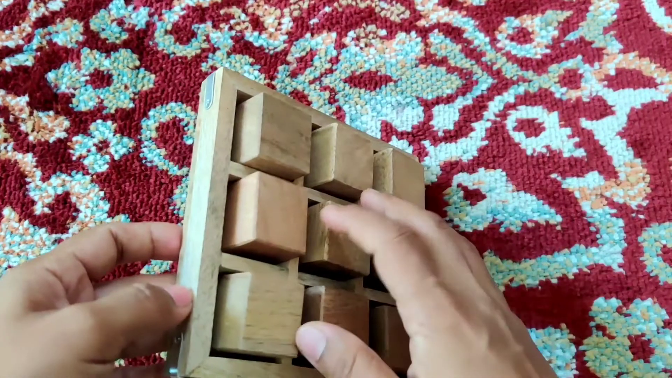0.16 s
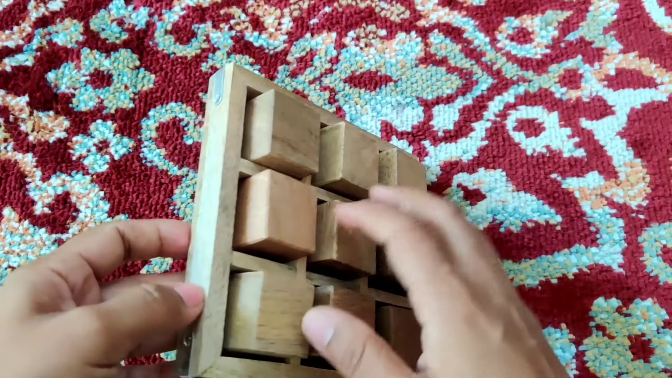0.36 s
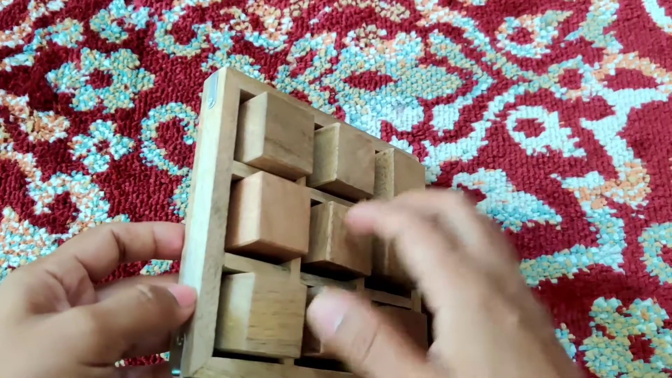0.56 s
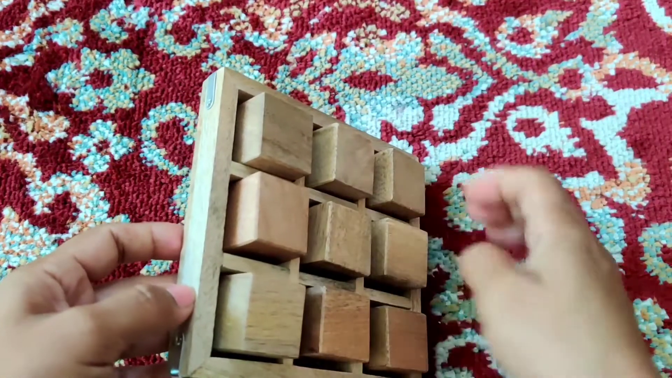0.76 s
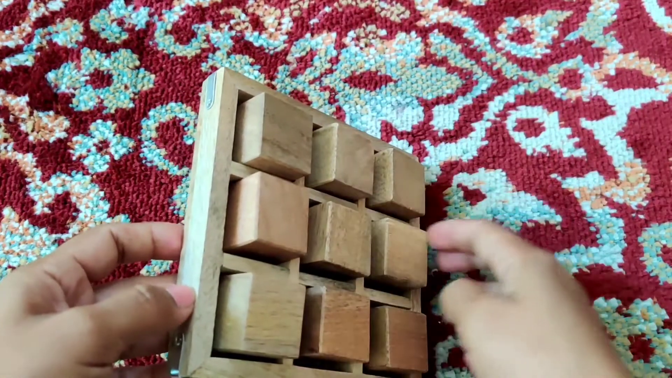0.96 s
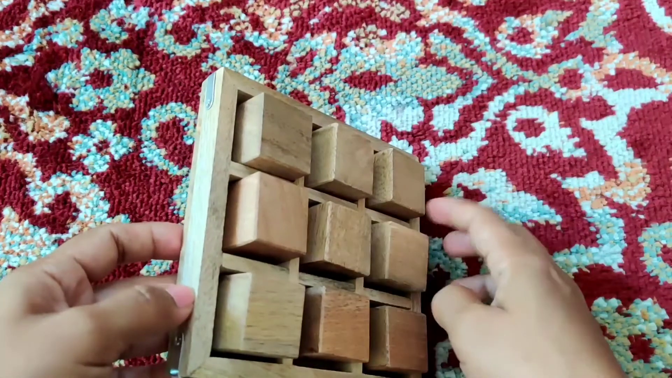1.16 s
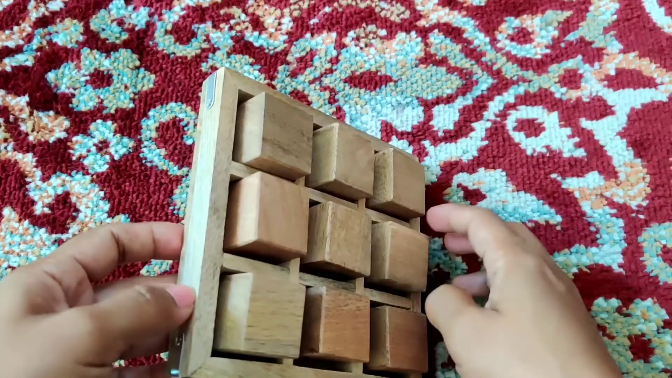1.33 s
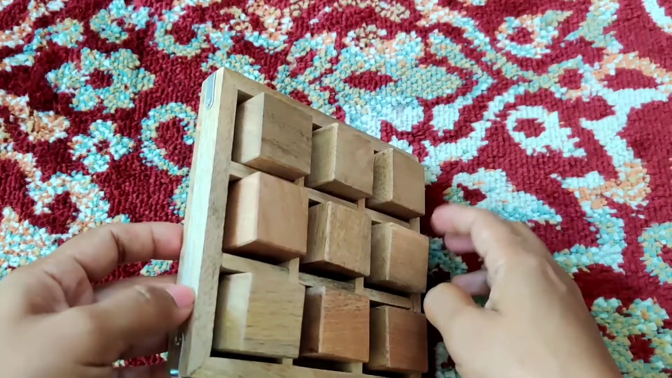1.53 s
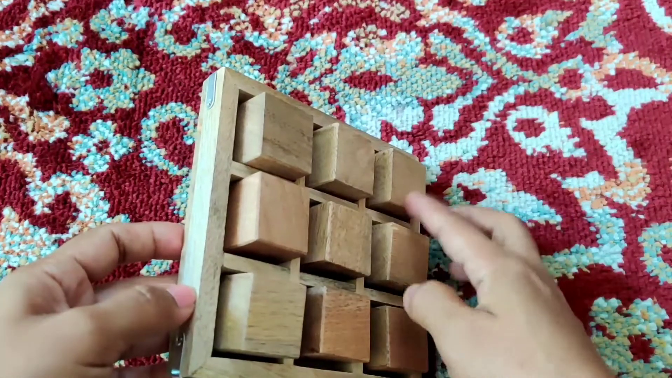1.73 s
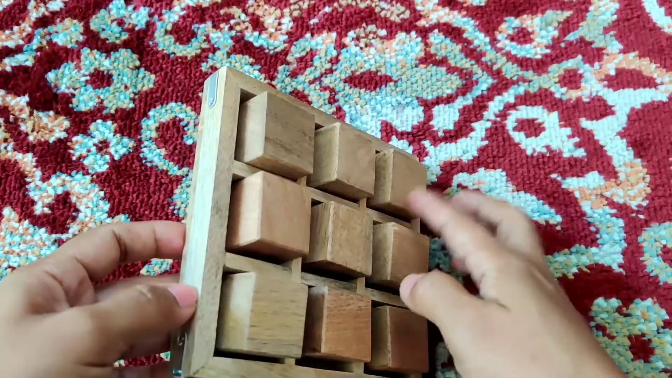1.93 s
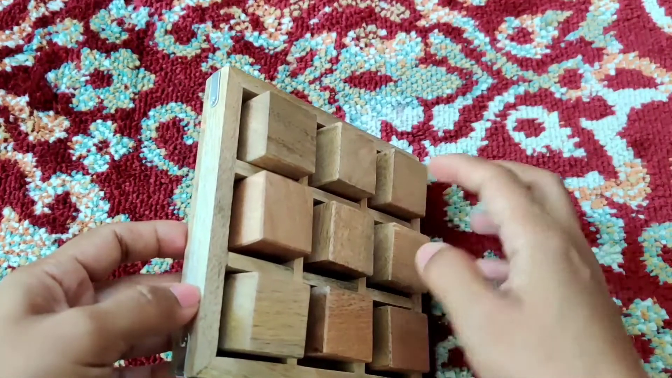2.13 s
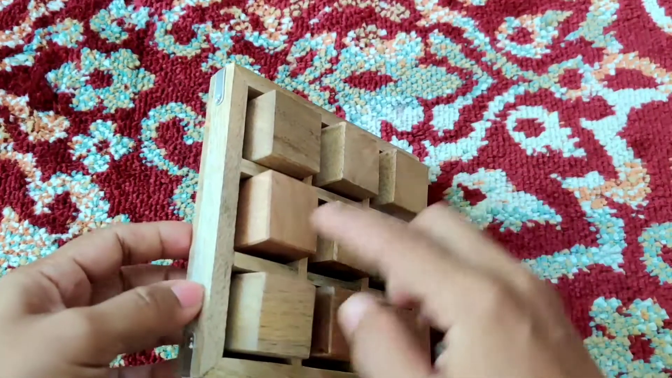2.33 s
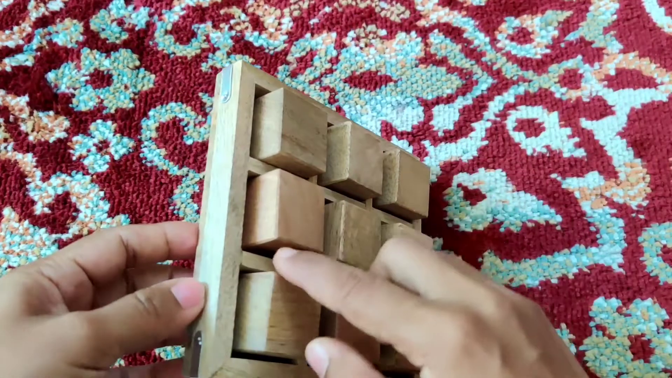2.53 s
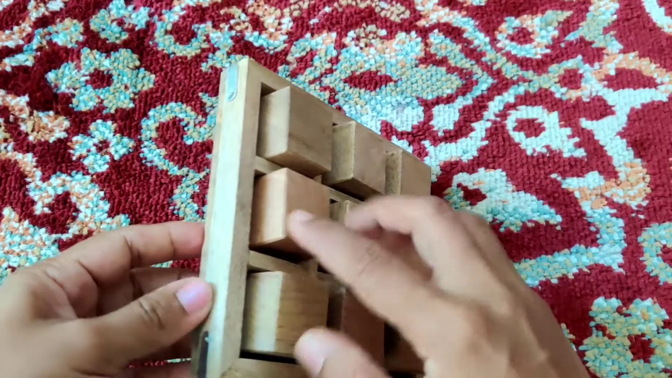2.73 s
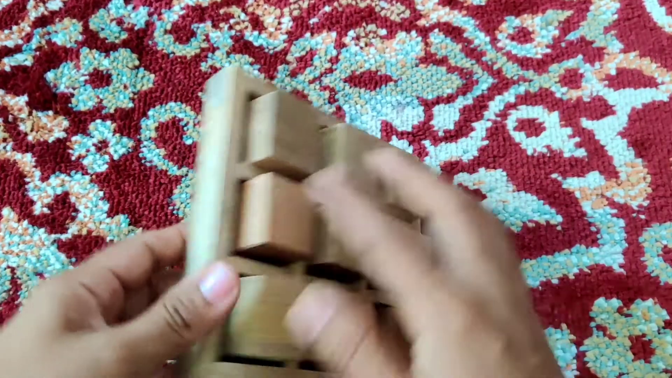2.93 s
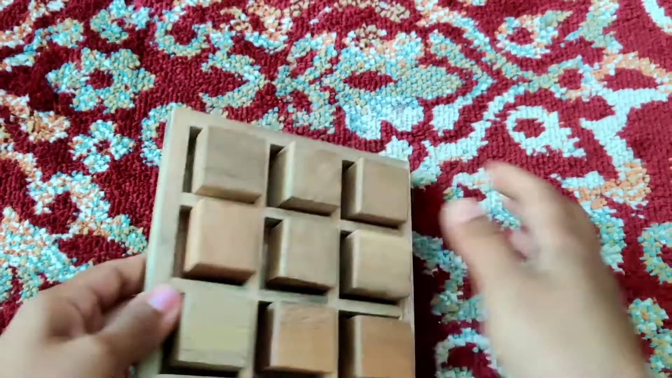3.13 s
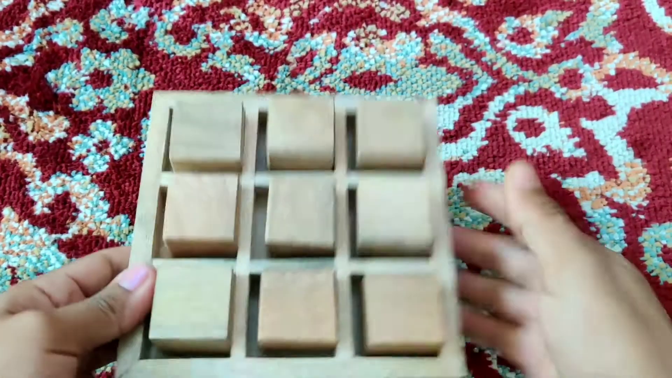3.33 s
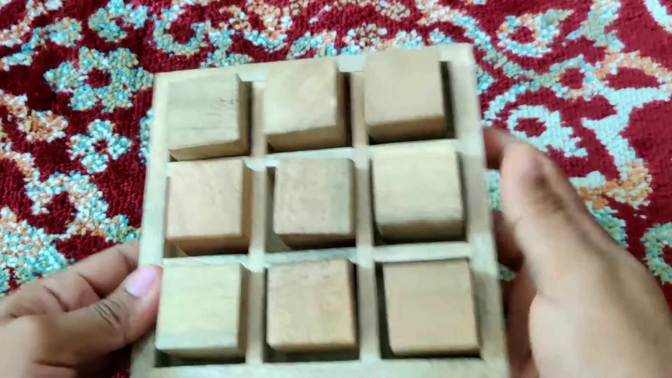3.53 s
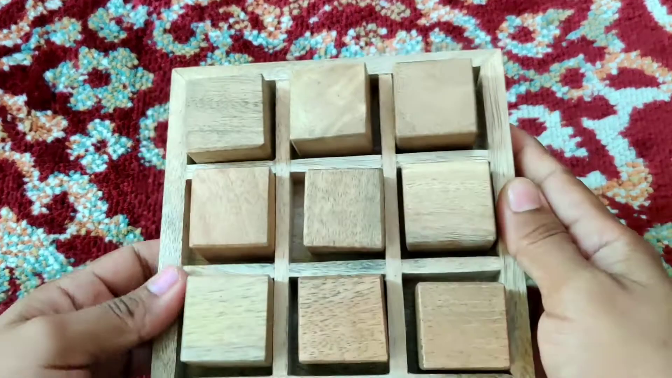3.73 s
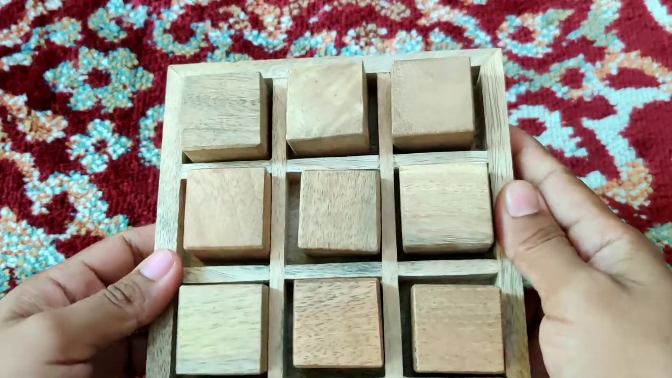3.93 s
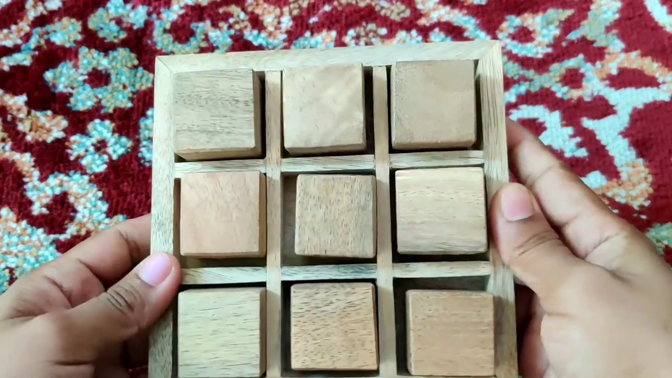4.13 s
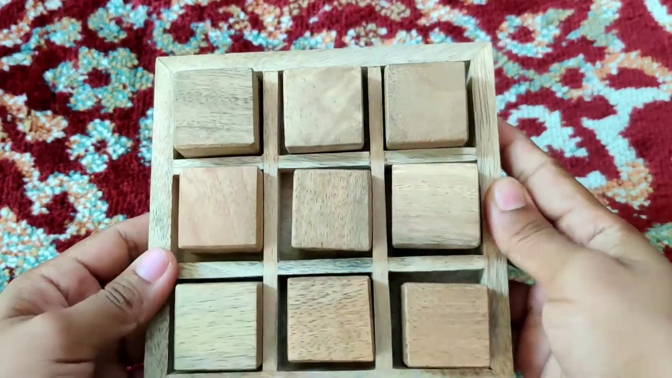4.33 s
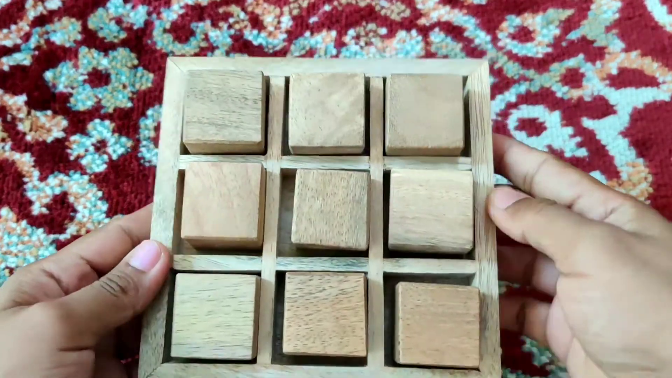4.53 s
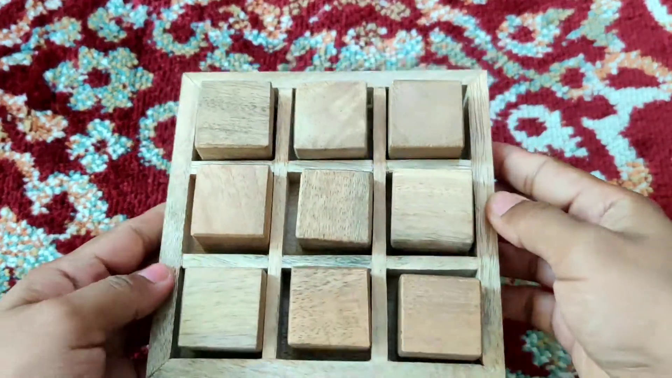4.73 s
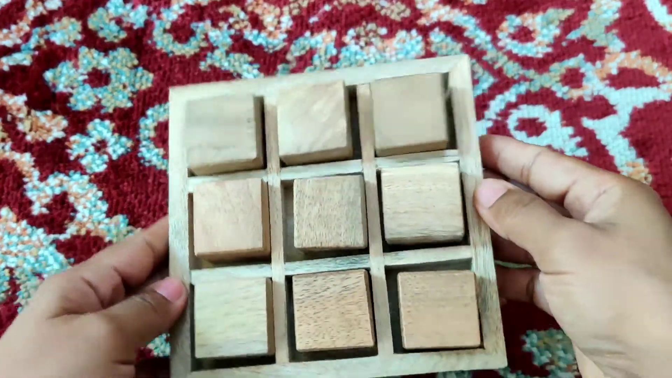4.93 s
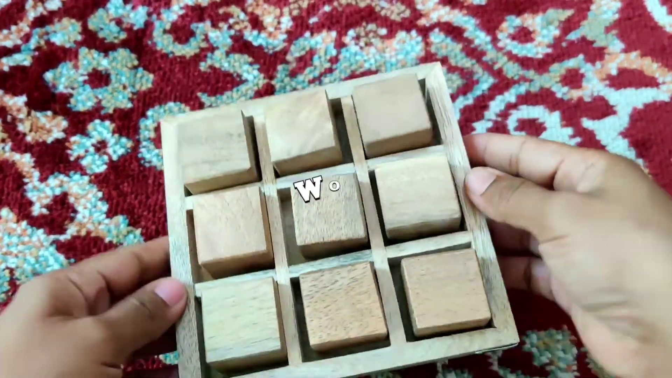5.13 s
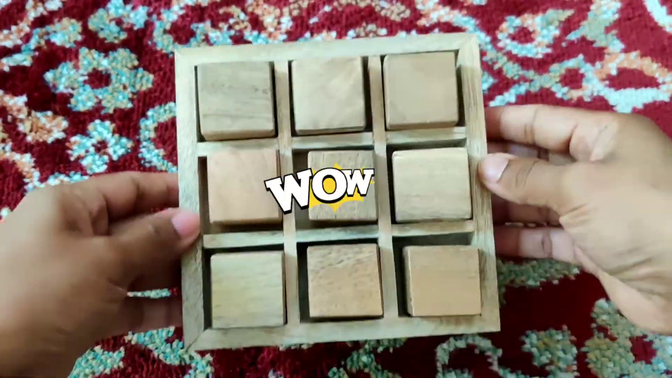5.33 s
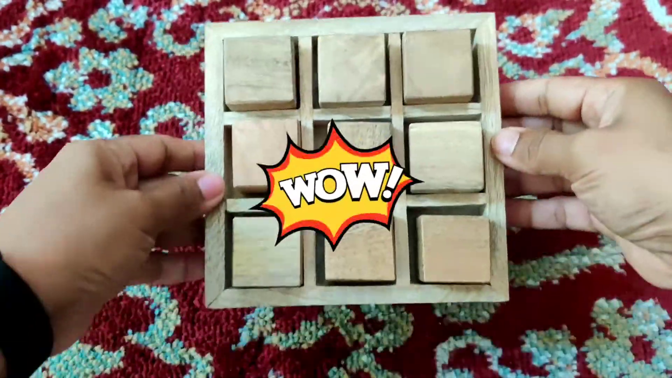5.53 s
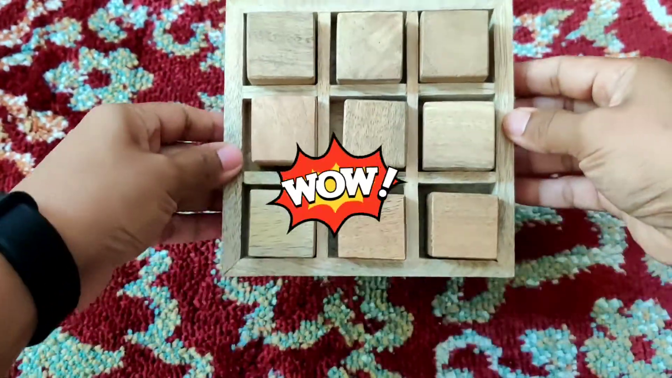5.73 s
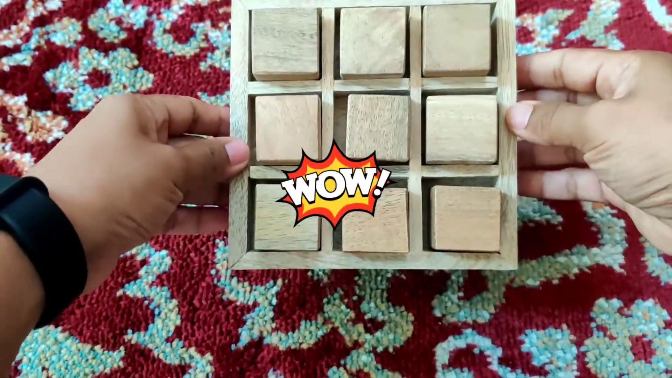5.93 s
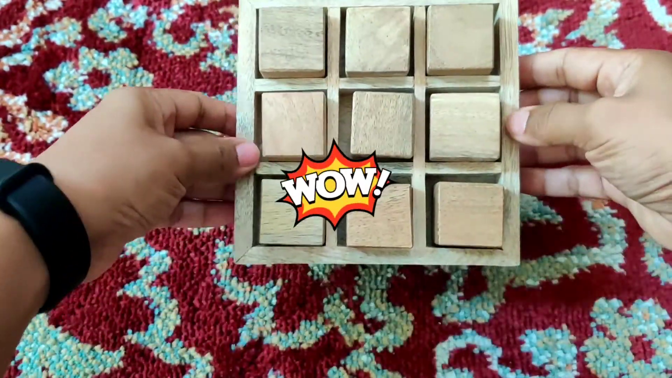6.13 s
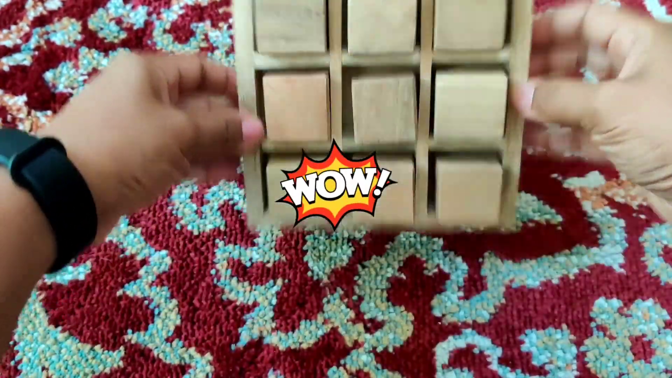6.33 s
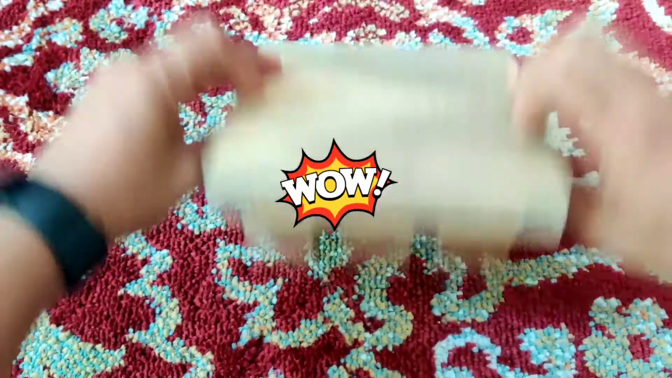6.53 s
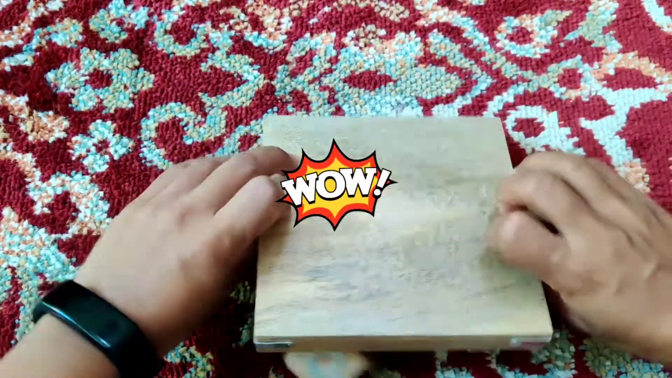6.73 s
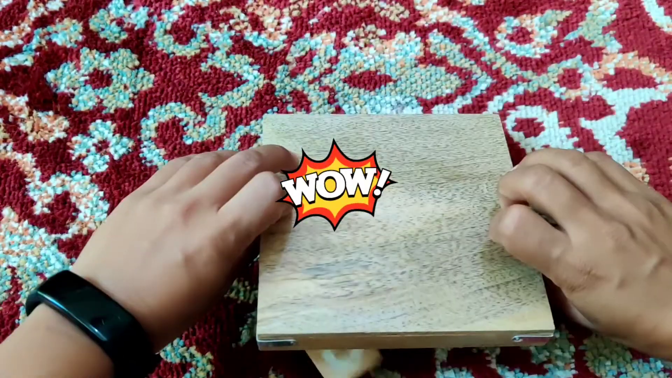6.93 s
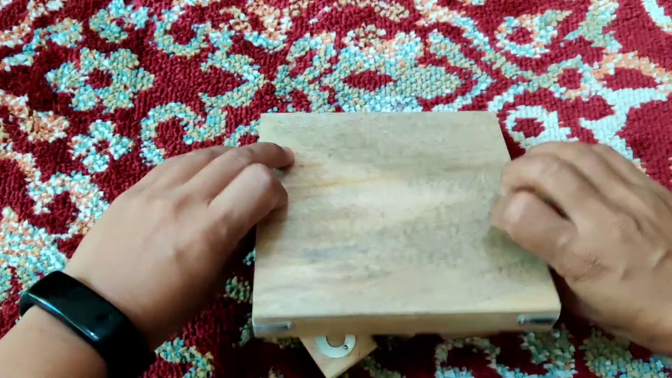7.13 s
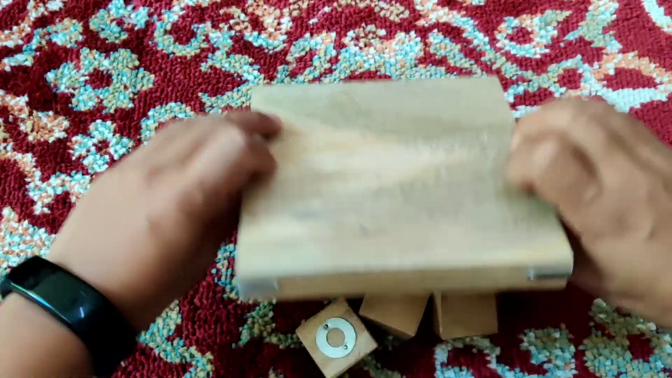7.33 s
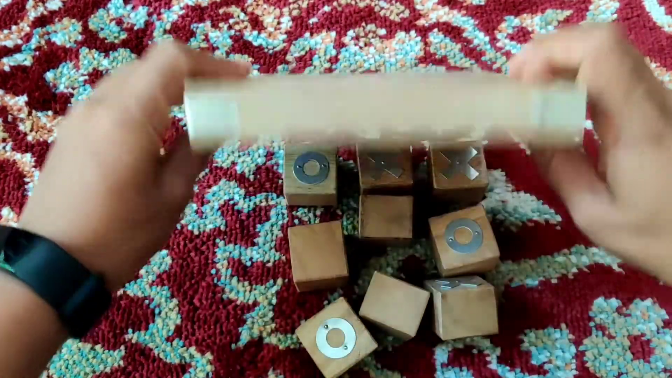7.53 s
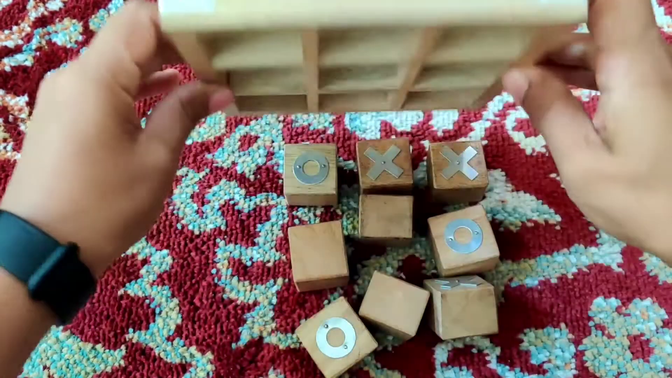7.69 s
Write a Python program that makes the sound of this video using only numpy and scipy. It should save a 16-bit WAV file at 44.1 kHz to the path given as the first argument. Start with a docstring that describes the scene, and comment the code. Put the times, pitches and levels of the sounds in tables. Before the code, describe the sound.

Loose wooden cubes clack and rattle softly in a handheld wooden tray, then the tray is flipped onto carpet with one loud clattering knock.

```python
"""Over a quiet room's murmur, loose cubes in a wooden tray tap their pockets and fingers brush the wood.
Two cubes clack, faces chirp; then the tray tilts and the cubes slide, knock and rattle.
Near the end the tray, overturned, lands on carpet: a clattering knock, jostling, rocking, late topples.
Knocks are struck modes plus a noise tick; friction is gated, coloured noise; chirps are swept sines.
Two unlike microphone ports pick up the tray; early echoes and a diffuse room tail follow."""
import sys
import numpy as np
from scipy import signal
from scipy.fft import rfft, irfft, next_fast_len
from scipy.io import wavfile

SR = 44100
rng = np.random.default_rng(int(sys.argv[2]) if len(sys.argv) > 2 else 0)


def generate_wav(sig):
    """Save sig (samples, or channels by samples) to the path in sys.argv[1] as 16-bit PCM at SR."""
    pcm = np.round(np.clip(np.atleast_2d(sig).T, -1, 1) * 32767).astype(np.int16)
    wavfile.write(sys.argv[1], SR, pcm)


N = 346581
HIT_S = np.arange(int(.6 * SR)) / SR  # time axis of the longest knock
ATTACK = int(.004 * SR)  # samples over which a knock's level is set


def undb(db):
    """Decibels to gain."""
    return 10 ** (np.asarray(db) / 20)


def along(points, hz):
    """Read (Hz, value) points on a log-frequency axis."""
    point_hz, value = np.transpose(points)
    return np.interp(np.log(np.maximum(hz, 1)), np.log(point_hz), value)


def colour(x, points):
    """Causal, minimum-phase filter with the given (Hz, dB) response."""
    size = next_fast_len(x.shape[-1] + 2048, True) * 2
    gain = undb(along(points, np.fft.rfftfreq(size, 1 / SR)))
    # fold the cepstrum onto positive time
    cepstrum = irfft(np.log(gain))
    cepstrum[1:size // 2] *= 2
    cepstrum[size // 2 + 1:] = 0
    response = np.exp(rfft(cepstrum))
    return irfft(rfft(x, size) * response)[..., :x.shape[-1]]


def level(x, db, count=None):
    """Scale to an rms level, taken over the first count samples."""
    return x * undb(db) / np.sqrt(np.mean(x[..., :count] ** 2) + 1e-30)


def add(out, s, x):
    """Mix a sound in at time s."""
    start = max(int(round(s * SR)), 0)
    out[:, start:start + x.shape[-1]] += x[..., :N - start]


def diffuse(count, apart_hz=3500, least=0.51):
    """Noise from all around: most alike at both ports in the bass, unrelated in the treble."""
    mid, side = rfft(rng.standard_normal((2, count)))
    hz = np.fft.rfftfreq(count, 1 / SR)
    share = np.clip(least + (hz / apart_hz) ** 2, 0, 1)
    sign = np.array([[1], [-1]])
    return irfft((mid + sign * share * side) / np.sqrt(1 + share ** 2), count)


def place(x, pan_db, lag_samples=2):
    """Left is louder than right by pan_db; the right port always lags."""
    right = np.pad(x[1], (lag_samples, 0))[:-lag_samples]
    return np.array([x[0] * undb(pan_db / 2), right * undb(-pan_db / 2)])


def ring(modes, db, pitch=1, scatter_db=2, detune=.012, apart_hz=4500, rise_s=.0007):
    """Struck modes swell during contact, then decay; random level, tuning and phase for each blow."""
    hz, mode_db, t60_s = np.transpose(modes)[:, :, None]
    size, tune, skew, lead = rng.standard_normal((len(modes), 4)).T[:, :, None]
    hz = hz * pitch * (1 + detune * tune)
    t = HIT_S[:int(1.3 * t60_s.max() * SR) + ATTACK]
    decay = undb(mode_db + scatter_db * size - 60 * t / t60_s)
    contact = np.sin(np.pi / 2 * np.minimum(t / rise_s, 1)) ** 2
    waves = contact * decay * np.exp(2j * np.pi * hz * (t - rise_s) + 1j * lead)
    # high modes reach the ports out of step
    turn = np.exp(.5j * skew * np.minimum(hz / apart_hz, 1) ** 2)
    both_ports = np.imag([(waves * turn).sum(0), (waves / turn).sum(0)])
    return level(both_ports, db, count=ATTACK)


def tick(spectrum, db, t60_s):
    """The brief crack of two hard faces meeting: decaying noise, coloured."""
    t = HIT_S[:2048]
    crack = diffuse(len(t)) * undb(-60 * t / t60_s)
    return level(colour(crack, spectrum), db, count=ATTACK)


def brightness(hardness, hard_db, loss_db):
    """A part's dB over the wall: hard_db at hardness 1, loss_db less at hardness 0."""
    return hard_db - loss_db * (1 - np.clip(hardness, 0, 1))


def chatter(s, length_s, db, fall_db, count):
    """Times and levels of an uneven, fading run of knocks."""
    progress = (np.arange(count) + rng.random(count)) / count
    scatter_db = 2.5 * rng.standard_normal(count)
    return zip(s + length_s * progress, db - fall_db * progress + scatter_db)


def rubbing(strokes, spectrum, grains_per_s, spread_db, smooth, uneven_db=4.0):
    """Friction: the surface catches and slips in tiny grains; each stroke starts quickly, wavers, fades."""
    out = np.zeros((2, N))
    for s, length_s, db in strokes:
        count = max(int(length_s * SR), 64)
        t = np.arange(count) / SR
        slipping = rng.random(count) < grains_per_s / SR
        slips = slipping * undb(spread_db * np.minimum(rng.exponential(size=count), 2))
        # each slip dies off with a 0.4 ms time constant, over a smooth floor
        grip = smooth + signal.lfilter([1], [1, -np.exp(-1 / (.0004 * SR))], slips)
        # a new random pressure every 7 ms
        wander = np.interp(t, np.arange(100) * .007, rng.standard_normal(100))
        pressure = undb(uneven_db * wander)
        swell = np.sin(np.pi * np.linspace(0, 1, count) ** 0.55).clip(0) ** 0.5
        stroke = np.pad(diffuse(count) * grip * pressure * swell, ((0, 0), (0, ATTACK)))
        add(out, s, level(colour(stroke, spectrum), db))
    return out


# Murmur of air in the room. Each row: frequency in Hz, relative spectral density in dB.
AIR_COLOUR = [(15, -54.5), (25, -14), (91, -9.5), (156, -8.5), (188, -3), (215, -10.5), (274, -4.5),
              (322, -14.5), (445, -13), (582, -21), (631, -18.5), (1140, -18.5), (2230, -28.5), (8130, -44),
              (15500, -45)]
# Low room resonances. Each row: centre in Hz, half-width to -6 dB in Hz, rms level in dB.
DRONES = [(192.4, 11, -72), (272.7, 30, -71)]


def air(murmur_db=-65):
    """Steady coloured room noise with two wavering low resonances of filtered noise."""
    hz = np.fft.rfftfreq(N, 1 / SR)
    out = level(colour(diffuse(N, apart_hz=1348, least=0.26), AIR_COLOUR), murmur_db)
    for centre_hz, width_hz, db in DRONES:
        resonance = 1 / (1 + ((hz - centre_hz) / width_hz) ** 2)
        out = out + level(irfft(rfft(diffuse(N, least=.2)) * resonance, N), db)
    return out


# Modes of the open tray's base board, its pocket walls and a cube.
# Each row: frequency in Hz, relative level in dB, t60 in s.
BOARD_MODES = [(617, -9.5, .02), (850, -3.5, 0.014), (1050, -4, 0.024)]
WALL_MODES = [(1246, -8, 0.051), (1440, -3, 0.03), (1640, 3.5, 0.015), (1840, -7.5, 0.017),
              (2094, -5, 0.023)]
CUBE_MODES = [(2770, -1.5, 0.014), (3370, -2, 0.016), (3635, -4, 0.025), (4290, -4, .014),
              (4780, -7, 0.012), (5390, -6.5, 0.0063)]
# Colour of a hard contact. Each row: frequency in Hz, relative level in dB.
TICK_COLOUR = [(500, -24.5), (1200, 1), (3000, -4.5), (5600, -2.5), (6700, 1.5), (7500, -6), (9000, -19.5),
               (12000, -24), (15500, -27.5)]
WALL_HZ = 1640  # wall pitch at which WALL_MODES holds
TICK_GROWTH, ORDINARY_DB = 0.69, -52  # tick dB per knock dB, around an ordinary knock's level


def add_tap(out, s, db, hardness, board_db, wall_hz, pan_db):
    """A cube taps its pocket: board, wall and cube ring together; hard contacts are bright."""
    cube_db = db + brightness(hardness, hard_db=0.91, loss_db=31.5)
    # the tick grows more slowly than the ring
    tick_db = ORDINARY_DB + TICK_GROWTH * (db - ORDINARY_DB)
    tick_db = tick_db + brightness(hardness, hard_db=-4.5, loss_db=30)
    parts = (ring(BOARD_MODES, db + board_db, detune=.03, rise_s=.0015),
             ring(WALL_MODES, db, pitch=wall_hz / WALL_HZ, rise_s=.001),
             ring(CUBE_MODES, cube_db, detune=.025, rise_s=.0004),
             tick(TICK_COLOUR, tick_db, t60_s=0.011))
    for part in parts:
        add(out, s, place(part, pan_db))


# Cube knocks. Each row: start in seconds, wall level in dB, contact hardness 0-1,
# base board over wall in dB, wall pitch in Hz, left minus right in dB.
TAP_EVENTS = [(.017, -60.5, 0.98, -22, 1564, -2), (0.576, -69, 0.96, 2, 1550, -4),
              (.584, -56.5, 0.45, -16, 1510, 6), (1.1, -48.5, 0.27, -29, 1590, 6.5),
              (1.11, -53, 0.5, -20, 1545, -2), (1.196, -47.5, 1, -22, 1535, 1),
              (1.209, -48, 1, -19, 1570, -3), (1.226, -53.5, 0.6, -22, 1530, 4),
              (3.238, -54, .4, -14, 1605, 5), (3.439, -64.5, 0.69, 1.5, 1730, 2),
              (3.489, -51, .1, -4, 1570, 2), (3.495, -47.5, 0, -7, 1560, 3),
              (3.505, -44, 0.5, -11, 1630, 1), (3.513, -40.5, 0.5, -14, 1655, -1),
              (3.527, -45, 0.6, -1, 1550, 2), (3.6, -44.5, .3, -11, 1700, 2),
              (3.653, -52, 0.36, -4, 1590, 1), (3.821, -66, 0.6, 7.5, 1510, 2),
              (3.933, -50, 0.34, -5, 1820, 2), (3.991, -51.5, 0.76, -3, 1680, 0.5),
              (4.057, -59, .6, 4, 1660, 1), (4.194, -61.5, .25, -1, 1640, 2),
              (4.266, -60.5, 0.52, 5.5, 1630, 2), (4.3, -37, 0.69, -23, 1740, 2.5),
              (4.927, -57, 0.2, 4.5, 1730, 1), (4.942, -52.5, 0.36, 1, 1600, 1),
              (5.012, -57, 0.7, 0.5, 1730, 0), (5.024, -57, .45, -2, 1680, 2),
              (5.1, -64.5, 0.5, -1, 1510, 4), (5.135, -59.5, 0.46, 0, 1550, -4),
              (5.145, -51, 0.45, -2, 1660, 2), (5.363, -54.5, 0.2, -10, 1710, 3),
              (5.404, -59.5, .55, 1, 1640, 1), (5.411, -58, 0.84, 0, 1620, 2),
              (5.477, -33.5, 0.63, -28, 1746, 3), (5.479, -30, 0.77, -32, 1800, 1),
              (6.01, -55, 0.89, -8, 1660, -8), (6.017, -52.5, 0.6, -10, 2180, 7),
              (6.419, -47.5, 0.8, -26, 2140, -3), (6.43, -45.5, 0.82, -13, 2050, -3),
              (6.439, -47, 0.91, -24, 2060, -1.5)]


def taps():
    """Single knocks of cubes on pocket walls as the open tray is tilted."""
    out = np.zeros((2, N))
    for tap in TAP_EVENTS:
        add_tap(out, *tap)
    return out


# Fingers on wood. Each row: start in seconds, length in seconds, rms level in dB.
BRUSH_STROKES = [(.17, 0.021, -81), (.735, 0.045, -74.5), (1.73, 0.12, -78.5), (1.99, 0.011, -70.5),
                 (2.73, 0.062, -74), (3.04, 0.11, -80.5), (3.69, 0.13, -74), (3.88, 0.058, -79),
                 (4.1, 0.13, -79.5), (4.47, 0.41, -76), (5.36, 0.15, -75.5), (5.73, 0.077, -75.5),
                 (6.13, .07, -84), (6.38, 0.11, -73.5), (7.735, 0.049, -74)]
# Each row: frequency in Hz, relative level in dB.
BRUSH_SPECTRUM = [(1500, -5), (3400, 0.5), (4500, -6), (5700, -3.5), (6600, 1), (7600, -5.5), (9500, -14.5),
                  (13000, -12.5), (15500, -18)]


def brushes():
    """Fingers brush the wood: dense, smooth friction."""
    return rubbing(BRUSH_STROKES, BRUSH_SPECTRUM, grains_per_s=440, spread_db=2.0, smooth=0.73)


# Cube against cube. Each row: start in seconds, level in dB.
CLACK_EVENTS = [(1.196, -40.5), (1.209, -39.5)]
# Modes of a free cube. Each row: frequency in Hz, relative level in dB, t60 in s.
FREE_CUBE_MODES = [(2330, -13.5, 0.015), (2920, -17, 0.014), (3370, -0.5, 0.012), (4230, -17, 0.0063),
                   (5500, -11, 0.0075), (6500, -6.5, 0.0055)]


def clacks():
    """A cube snaps against its neighbour near the left port and rings freely: bright and dry."""
    out = np.zeros((2, N))
    for s, db in CLACK_EVENTS:
        clack = ring(FREE_CUBE_MODES, db, scatter_db=1, detune=.003, apart_hz=9000, rise_s=.0003)
        add(out, s, place(clack, pan_db=8.0))
    return out


# Chirps. Each row: start in seconds, length in seconds, start pitch in Hz, end pitch in Hz, level in dB.
SQUEAK_EVENTS = [(1.989, 0.003, 7400, 6100, -59), (3.631, 0.0036, 8000, 5600, -68),
                 (3.643, 0.0069, 8100, 4500, -72), (3.65, 0.0047, 7750, 4800, -71)]


def squeaks():
    """A polished face sticks and slips: falling sine chirps a few milliseconds long."""
    out = np.zeros((2, N))
    for s, length_s, start_hz, end_hz, db in SQUEAK_EVENTS:
        hz = np.linspace(start_hz, end_hz, int(length_s * SR))
        chirp = np.sin(2 * np.pi * np.cumsum(hz) / SR) * np.hanning(len(hz))
        add(out, s, level(chirp, db))
    return out


# Cubes on the base board. Each row: start in seconds, length in seconds, rms level in dB.
SLIDE_STROKES = [(3.485, 0.068, -54), (3.598, 0.089, -58), (3.67, 0.1, -69), (3.93, 0.067, -66),
                 (4.922, 0.041, -58), (5.008, 0.033, -62), (5.36, 0.055, -69), (5.395, 0.039, -60),
                 (6.4, 0.078, -64)]
# Each row: frequency in Hz, relative level in dB.
SLIDE_SPECTRUM = [(300, -11.5), (800, -4), (1300, -5.5), (1750, 0), (2300, -5), (2800, -17), (4200, -23),
                  (4800, -16), (5600, -29), (6800, -24), (9000, -36.5), (15000, -43)]


def slides():
    """Cubes slide on the base board: sparse, grainy friction."""
    return rubbing(SLIDE_STROKES, SLIDE_SPECTRUM, grains_per_s=210, spread_db=4.0, smooth=.2)


# Chattering cubes. Each row: start in seconds, length in seconds, first wall level in dB,
# contact hardness 0-1, base board over wall in dB, wall pitch in Hz.
RATTLE_EVENTS = [(3.603, .06, -53.5, 0.4, 3.5, 1640), (3.638, .12, -59, .45, 7.5, 1640),
                 (3.936, .06, -56.5, 0.2, -5, 1620), (4.27, .025, -69.5, 0.66, 7, 1620),
                 (5.369, .09, -58, 0, -1, 1690), (5.483, .028, -38.5, 0.57, -15.5, 1807)]


def rattles(fall_db=10.5, pan_db=1.5):
    """A loose cube chatters on in six uneven, fading taps."""
    out = np.zeros((2, N))
    for start, length_s, first_db, hardness, board_db, wall_hz in RATTLE_EVENTS:
        for s, db in chatter(start, length_s, first_db, fall_db, count=6):
            add_tap(out, s, db, hardness, board_db, wall_hz, pan_db)
    return out


# Modes of the overturned tray's board and walls, damped by the carpet, of the cubes in it,
# and of the air in the closed pockets. Each row: frequency in Hz, relative level in dB, t60 in s.
SHUT_BOARD_MODES = [(466, -8.5, 0.0075), (622, -7, 0.026), (780, -9.5, 0.032)]
SHUT_WALL_MODES = [(1300, -3.5, 0.016), (1317.4, 1, 0.046), (1421, 1.5, 0.042), (1485, -10.5, 0.046)]
SHUT_CUBE_MODES = [(2172, 2.5, 0.033), (2443, 0, .02), (2847, -1, .012), (3470, 0, 0.029),
                   (3970, -10, .012), (4970, -6, 0.024)]
POCKET_MODES = [(1182, -2, .3), (1239, -6, .2), (1267, -3, .3), (1290, -4, .35), (1351, -3, .3),
                (1408, 0, .38), (1470, -7, .55)]
# Contact heard through the tray. Each row: frequency in Hz, relative level in dB.
SHUT_TICK_COLOUR = [(500, -20), (1500, -2.5), (2400, 1.5), (4200, 0), (5600, -3.5), (7000, 1),
                    (8000, -11.5), (10000, -17.5), (15500, -27.5)]


def shut_knocks(events, pocket_db=-20):
    """Blows under the overturned tray: board, walls, cubes and tick; pocket air rings on."""
    out = np.zeros((2, N))
    for s, db, hardness in events:
        board_db = db + brightness(hardness, hard_db=-8, loss_db=17.4)
        cube_db = db + brightness(hardness, hard_db=7.2, loss_db=30.8)
        tick_db = db + brightness(hardness, hard_db=-3, loss_db=31)
        add(out, s, ring(SHUT_BOARD_MODES, board_db, detune=.04, rise_s=.002))
        add(out, s, ring(SHUT_WALL_MODES, db, scatter_db=1.5, rise_s=.0018))
        add(out, s, ring(SHUT_CUBE_MODES, cube_db, detune=0.035, apart_hz=2800, rise_s=0.00087))
        add(out, s, tick(SHUT_TICK_COLOUR, tick_db, t60_s=0.013))
        add(out, s, ring(POCKET_MODES, db + pocket_db, detune=0, rise_s=.003))
    return out


# Cube impacts. Each row: start in seconds, wall level in dB, contact hardness 0-1.
LANDING_EVENTS = [(6.706, -38, 0.5), (6.722, -56.5, 1), (6.728, -51, 0.88), (6.741, -16.5, 0.54),
                  (6.7445, -26, 0.97), (6.754, -18, 0.52), (6.7565, -19, 0.84), (6.7655, -23.5, 0.7),
                  (6.777, -25, 0.27), (6.863, -41.5, 0.72), (7.019, -53.5, 0.67), (7.06, -51, .1),
                  (7.077, -58.5, 0.2), (7.236, -60.5, .1), (7.269, -62.5, 0.45)]


def landings():
    """Cubes and tray hit in a tight cluster; a few cubes topple late."""
    return shut_knocks(LANDING_EVENTS)


# Tray on carpet. Each row: start in seconds, length in seconds, rms level in dB.
SETTLE_STROKES = [(6.735, 0.058, -59.5), (6.8, .42, -60.5)]
# Each row: frequency in Hz, relative level in dB.
CARPET_SPECTRUM = [(25, -4), (60, -3.5), (120, -3.5), (220, 0.5), (330, -4.5), (600, -16), (2000, -32),
                   (15000, -44)]


def settles():
    """The tray settles into the carpet pile: smooth, low friction."""
    return rubbing(SETTLE_STROKES, CARPET_SPECTRUM, grains_per_s=150, spread_db=3.5, smooth=.9)


def jostling(start_s=6.757, length_s=.11, first_db=-37, fall_db=15.5, hardness=.72):
    """Cubes jostle each other: twelve uneven, fading knocks."""
    run = chatter(start_s, length_s, first_db, fall_db, count=12)
    return shut_knocks([(s, db, hardness) for s, db in run])


def rocking(start_s=6.789, gap_s=.0105, shrink=.88, first_db=-21, fall_db=20, hardness=.05, count=8):
    """The tray rocks to rest on the cubes: soft bounces, shrinking gaps, level falling ever faster."""
    gaps_s = gap_s * shrink ** np.arange(count - 1)
    elapsed_s = np.append(0, np.cumsum(gaps_s))
    levels_db = first_db - fall_db * (elapsed_s / elapsed_s[-1]) ** 2
    return shut_knocks([(start_s + t, db, hardness) for t, db in zip(elapsed_s, levels_db)])


# Nearby furniture and walls. Each row: delay in seconds, gain in dB.
EARLY_ECHOES = [(0.01, -16), (.024, -24), (0.033, -29)]


def reflections(x):
    """A few distinct early echoes: delayed, quieter copies."""
    return sum(undb(db) * np.pad(x, ((0, 0), (int(delay_s * SR), 0)))[:, :N]
               for delay_s, db in EARLY_ECHOES)


# Colour of the room tail. Each row: frequency in Hz, relative level in dB.
TAIL_COLOUR = [(200, -16), (600, -9.5), (1400, -14), (2300, -14.5), (3500, -14), (5000, -12.5),
               (7000, -10.5), (14000, -7)]
# Decay of the room tail. Each row: band centre in Hz, t60 in s.
TAIL_T60 = [(200, 0.5), (700, 0.79), (1500, .48), (3000, 0.7), (6000, 0.67), (14000, .42)]


def room(x, gap_s=0.0091, build_s=0.0026):
    """A small furnished room: dense reflections as noise that fades band by band."""
    t = np.arange(int(.8 * SR)) / SR
    log_hz = np.log(np.fft.rfftfreq(len(t), 1 / SR) + 1)
    noise = rfft(diffuse(len(t), apart_hz=2715))
    centres = np.log([hz for hz, _ in TAIL_T60])
    build = 1 - np.exp(-np.maximum(t - gap_s, 0) / build_s)
    response = 0
    # overlapping triangular bands on a log-frequency axis
    for weights, (_, t60_s) in zip(np.eye(len(centres)), TAIL_T60):
        band = irfft(noise * np.interp(log_hz, centres, weights), len(t))
        fade = build * np.exp(-np.log(1000) * t / t60_s)
        response = response + band * fade / np.sqrt(np.sum(fade ** 2))
    mono = x.mean(0, keepdims=True)
    return signal.fftconvolve(mono, colour(response, TAIL_COLOUR), axes=1)[:, :N]


# Port colour. Each row: frequency in Hz, left minus right in dB.
PORT_DIFFERENCE = [(100, -2), (600, 0.5), (1500, 1), (2500, 0), (3400, 6), (4100, 3.5), (5000, 1.5),
                   (6500, 10.5), (7700, -7.5), (10000, -6), (15000, 1)]
# Port treble resonances. Each row: frequency in Hz, width in Hz, ring over plain sound in dB.
LEFT_PORT_RINGS = [(4890, 260, -2.5), (6690, 480, -3)]
RIGHT_PORT_RINGS = [(7500, 400, -8.5)]


def port(x, side, rings):
    """Half the port difference (side +1 left, -1 right), then the port's cavity rings in the treble."""
    x = colour(x, [(hz, side * db / 2) for hz, db in PORT_DIFFERENCE])
    return x + sum(undb(db) * signal.lfilter(*signal.iirpeak(hz, hz / width_hz, fs=SR), x)
                   for hz, width_hz, db in rings)


def scene():
    """Tray sounds through two ports, with their echoes, over carpet friction and room murmur."""
    murmur = air()
    wood = taps() + brushes()
    close = clacks()
    wood = wood + squeaks() + slides() + rattles() + landings()
    carpet = settles()
    wood = wood + jostling() + rocking()
    left, right = wood + close
    direct = np.array([port(left, 1, LEFT_PORT_RINGS), port(right, -1, RIGHT_PORT_RINGS)])
    # the clacks are so near that little of them comes back from the room
    radiated = wood + undb(-6) * close
    return direct + reflections(radiated) + room(radiated) + carpet + murmur


def record(dry, ceiling=0.5, top_hz=15500):
    """The phone rounds the loudest peaks (tanh) and cuts everything above top_hz."""
    rounded = ceiling * np.tanh(dry / ceiling)
    return signal.sosfilt(signal.ellip(10, .2, 70, top_hz, fs=SR, output="sos"), rounded)


dry = scene()
out = record(dry)
generate_wav(out)
```